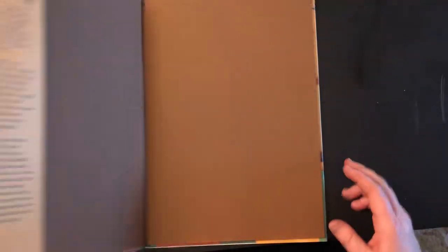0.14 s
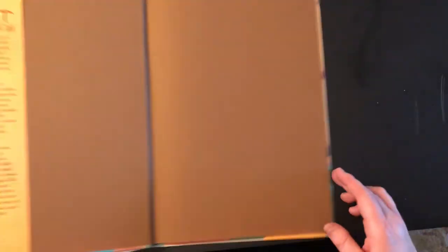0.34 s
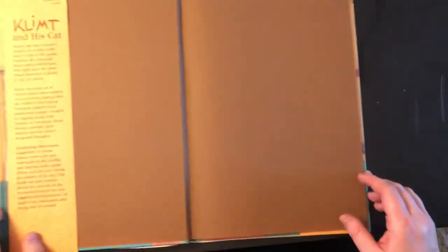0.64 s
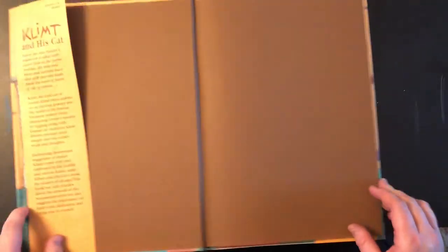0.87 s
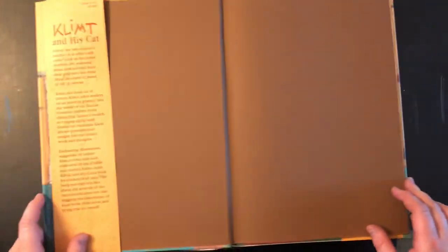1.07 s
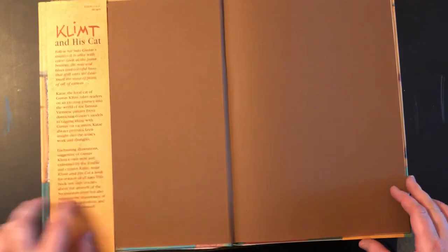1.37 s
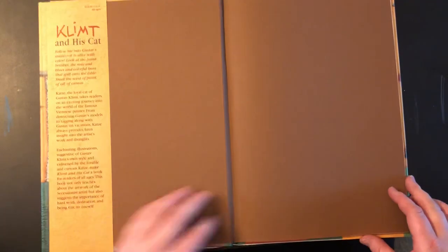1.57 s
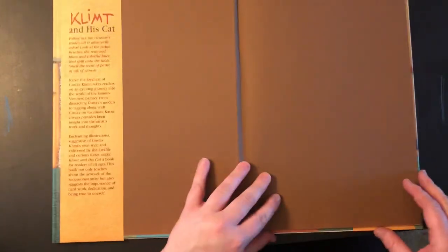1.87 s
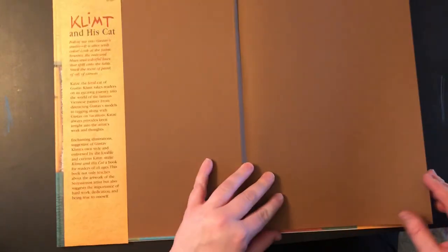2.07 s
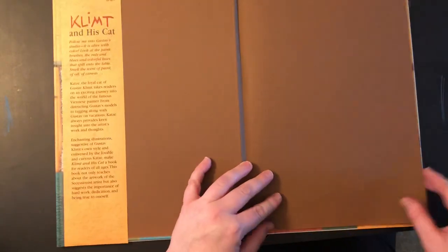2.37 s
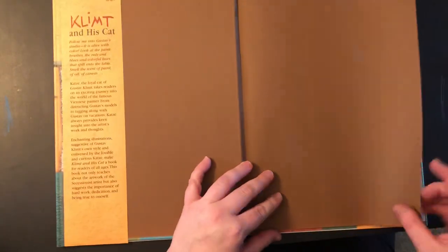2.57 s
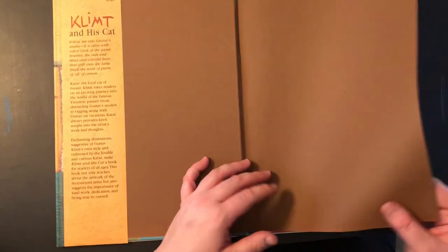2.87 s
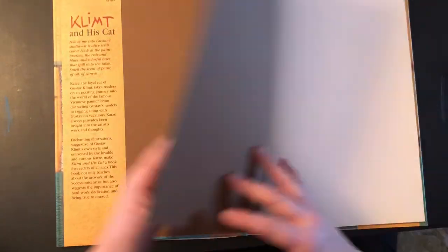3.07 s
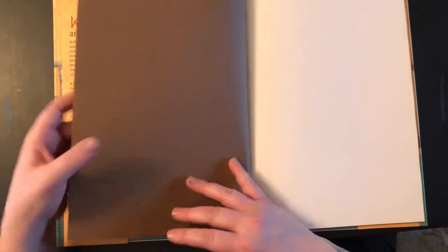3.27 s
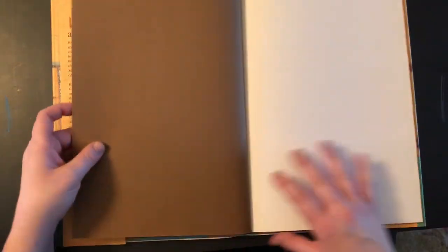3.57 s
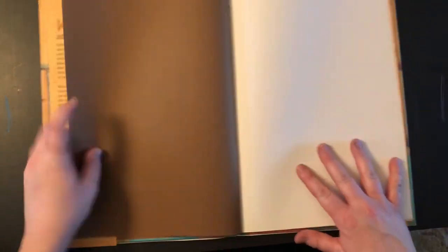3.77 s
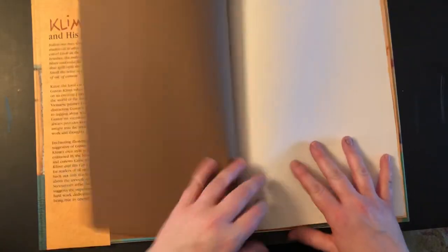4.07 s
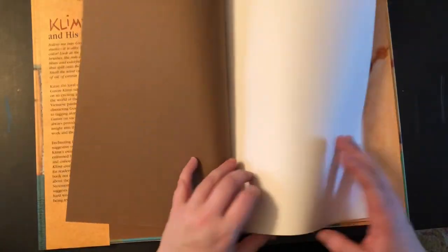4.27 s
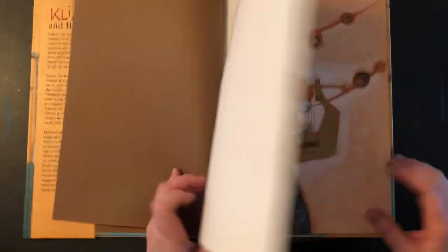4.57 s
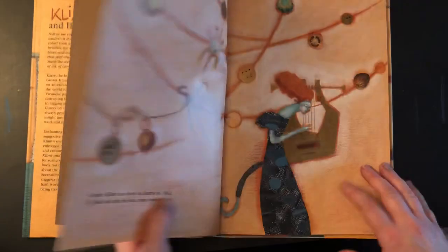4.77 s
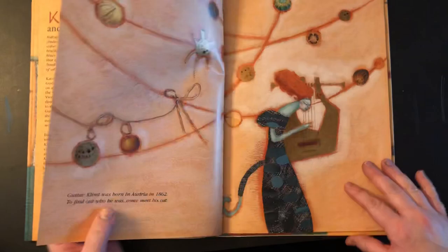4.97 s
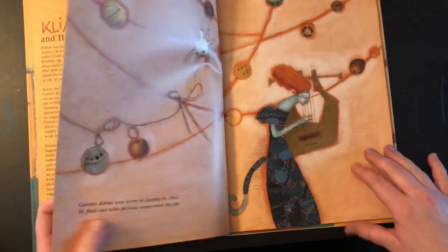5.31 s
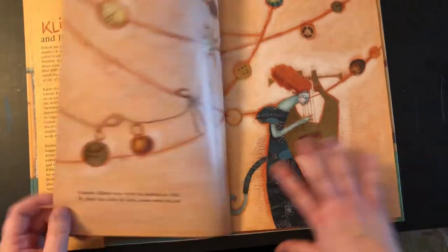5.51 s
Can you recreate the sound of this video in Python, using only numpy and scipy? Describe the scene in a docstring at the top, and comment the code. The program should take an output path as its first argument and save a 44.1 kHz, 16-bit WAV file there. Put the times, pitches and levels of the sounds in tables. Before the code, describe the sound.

Dry paper handling, heard close and centred: smooth swishes of palms and jacket paper, a brief pop, near quiet, then two heavy pages turned one after the other. Each page gives crisp edge snaps, a hissing slide and a boxy wobbling flutter. A last hard snap comes near the end with softer rustling. The room is small with very short reflections, over low steady air rumble and a barely audible hum.

```python
"""Opening a book and turning two pages

A large hardcover book is opened on a desk in a small room and two stiff pages are turned.
Cover, hands and paper slide with a dry hiss made of countless tiny slips and coarser crease ticks.
Each lifted sheet buckles with a hollow, fluttering rumble: soft pops ring its resonances.
Paper edges and the cover snap as short coloured impulses; ventilation rumble and hum lie below."""
import sys
import numpy as np
from scipy import signal
from scipy.fft import rfft, irfft
from scipy.io import wavfile
from scipy.ndimage import uniform_filter1d

SR = 44100
rng = np.random.default_rng(int(sys.argv[2]) if len(sys.argv) > 2 else 0)


def store_wav(level_fs):
    """Save 16-bit WAV to argv[1]."""
    pcm = np.round(np.clip(np.atleast_2d(level_fs), -1, 1) * 32767)
    wavfile.write(sys.argv[1], SR, pcm.T.astype(np.int16))


N = 248854
TIME = np.arange(N) / SR


def from_db(db):
    """Turn decibels into gain."""
    return 10 ** (np.asarray(db) / 20)


def rms_one(x):
    """Scale to an rms (average strength) of 1."""
    return x / np.sqrt(np.mean(x ** 2) + 1e-20)


def at_hz(points, hz):
    """Read a table by frequency, with straight lines on a logarithmic axis."""
    table_hz, values = np.array(points).T
    return np.interp(np.log(hz), np.log(table_hz), values)


def in_time(rows):
    """Join the rows of a curve in time by straight lines."""
    s, *columns = np.transpose(rows)
    return [np.interp(TIME, s, column) for column in columns]


def butter(x, hz, kind, order=2):
    """Butterworth filter that works forward in time only."""
    hz = np.clip(hz, 10, 0.45 * SR)
    sos = signal.butter(order, hz, kind, fs=SR, output="sos")
    return signal.sosfilt(sos, x + 1e-18)


def resonance(x, hz, width):
    """Ring at one pitch: a two-pole band-pass, width in Hz, with gain 1 at its peak."""
    r = np.exp(-np.pi * width / SR)
    feed = np.array([1, 0, -1]) * (1 - r * r) / 2
    feedback = [1, -2 * r * np.cos(2 * np.pi * hz / SR), r * r]
    return signal.lfilter(feed, feedback, x)


def coloured(x, spectrum):
    """Give a steady noise a spectrum; rms 1."""
    hz = np.maximum(np.fft.rfftfreq(N, 1 / SR), 1)
    return rms_one(irfft(rfft(x) * from_db(at_hz(spectrum, hz)), N))


def causal_response(spectrum, size):
    """Minimum-phase response of a short spectrum: nothing sounds before the blow."""
    hz = np.maximum(np.fft.rfftfreq(size, 1 / SR), 1)
    cepstrum = irfft(np.log(from_db(at_hz(spectrum, hz))), size)[:size // 2]
    return np.exp(rfft(2 * cepstrum, size) - cepstrum[0])


def drift(per_s):
    """Smooth random wandering, no faster than about per_s cycles a second; rms 1."""
    noise = rng.standard_normal(N + SR)
    return rms_one(butter(noise, per_s, "low")[SR:])  # skip the filter's start-up


def grains(per_s, spread_db, largest=2.9):
    """Clicks at random moments, of uneven size and random sign; rms 1."""
    sizes = from_db(spread_db * np.minimum(rng.exponential(1, N), largest))
    signs = rng.choice([-1, 1], N)
    return rms_one(sizes * signs * (rng.random(N) < per_s / SR))


# the background's rumble and soft hiss: (frequency [Hz], relative level per Hz [dB])
AMBIENCE = [(15, -62), (25, -33), (59, -10), (92, -14), (123, -4.5), (157, -10), (229, -12.5), (263, -14.5),
            (293, -18.5), (384, -20.5), (463, -23.5), (516, -26.5), (887, -37), (4490, -39.5), (16000, -50)]
AMBIENCE_DB = -60.5  # rms
HUM_HZ, HUM_DB = 120, -74.5  # the level is rms


def background():
    """Ventilation rumble and soft hiss as coloured noise, plus mains hum as a sine."""
    air = from_db(AMBIENCE_DB) * coloured(rng.standard_normal(N), AMBIENCE)
    hum = from_db(HUM_DB) * np.sqrt(2) * np.sin(2 * np.pi * HUM_HZ * TIME)
    return air + hum


# how long the room's reflections last: (frequency [Hz], time to fall 60 dB [s])
ROOM_T60 = [(150, 0.92), (1000, 0.1), (4000, 0.17), (15000, 0.27)]


def room(x, gap=0.0044):
    """Diffuse reflections follow after a short gap [s]; the bass dies away slowest."""
    age = np.arange(SR // 2) / SR
    edges = np.geomspace(120, 16000, 8)
    tail = np.zeros(len(age))
    for low, high in zip(edges, edges[1:]):
        t60 = at_hz(ROOM_T60, np.sqrt(low * high))
        band = butter(rng.standard_normal(len(age)), [low, high], "band")
        tail += band * from_db(-60 * age / t60)
    tail *= age > gap
    tail /= np.sqrt(np.sum(tail ** 2))
    tail = butter(tail, 4900, "low", order=1)
    return signal.fftconvolve(x, tail)[:N]


# early reflections off page, desk and stand: (average delay [s], gain)
ECHOES = [(.0009, 0.34), (.0021, -0.28), (.0037, .22)]


def page_echo(x, sway=0.1117):
    """Nearby surfaces mirror the sound; the paths change as the hand moves."""
    stretch = np.exp(sway * drift(1.5))
    return x + sum(gain * np.interp(TIME - lag * stretch, TIME, x) for lag, gain in ECHOES)


# paper, cover or palm sliding: the cover swings open and settles on the desk, the left hand leaves
# the jacket flap and smooths the endpaper, fingers find and turn the first sheet, then the second
# is dragged up, carried over and pressed flat: (time of peak [s], hiss level [dB], swell [s],
# fade [s], body level above the hiss [dB], sheen level above the hiss [dB])
STROKES = [ (0.01, -69.5, 0.033, 0.034, -1, -6), (0.087, -61.5, 0.017, 0.027, -7, -7),
           (0.135, -68, .02, 0.045, -6, -3), (0.184, -56, 0.014, 0.08, -3, -5),
           (0.37, -45, 0.062, 0.12, -6, -5), (0.441, -48, 0.076, 0.074, -2, -2.5),
           (0.53, -57.5, .05, 0.15, 2, -12), (0.75, -47.5, 0.16, 0.097, -1, -6.5),
           (0.93, -44, 0.15, .12, -10, -10), (1.03, -47, 0.054, 0.11, -6.5, -9.5),
           (1.245, -62.5, 0.035, 0.029, 4, 0), (1.288, -54.5, .025, 0.066, -8.5, -10),
           (1.375, -59, 0.013, 0.042, -1, -4), (1.425, -61.5, 0.017, 0.017, -13, 4.5),
           (1.668, -61, 0.0054, .07, -4, 1), (1.745, -51, 0.058, .11, -4, -7.5),
           (1.95, -65.5, 0.07, 0.11, 3.5, -10), (2.3, -64.5, 0.033, 0.07, -8, -18),
           (2.448, -72.5, 0.15, 0.19, 4.5, -25), (2.58, -52, .012, 0.079, -6.5, -9),
           (2.654, -49, 0.053, 0.046, -3.5, -2), (2.76, -54, 0.083, 0.071, -1, -6.5),
           (2.874, -45.5, 0.033, 0.044, -10, -10.5), (2.957, -46.5, 0.045, 0.041, -3, -1.5),
           (3.065, -61, 0.037, 0.045, -8, -1), (3.16, -65.5, 0.06, 0.06, 5, -13),
           (3.235, -59, 0.05, 0.088, 3.5, 0.5), (3.347, -54, 0.017, 0.035, -9, -4.5),
           (3.51, -64.5, 0.054, 0.17, 4, -6), (3.622, -57.5, .03, 0.1, 2.5, -3.5),
           (3.69, -63.5, 0.037, 0.065, 11, -7.5), (3.808, -43.5, 0.036, 0.048, -6, -5),
           (3.89, -47, 0.048, 0.06, -7.5, -0.5), (4.012, -48, 0.045, 0.024, -4.5, -4.5),
           (4.078, -53.5, 0.026, 0.042, -11, -2), (4.114, -42.5, 0.0098, 0.049, -0.5, 0),
           (4.18, -47, 0.05, 0.092, -15, -11), (4.28, -44, 0.082, 0.097, -8.5, -1.5),
           (4.38, -51, 0.031, 0.078, -7, -1.5), (4.532, -55, 0.12, 0.046, -3.5, -8),
           (4.628, -46, 0.082, 0.08, -7, -4.5), (4.72, -59.5, 0.091, 0.13, -1.5, 4.5),
           (4.855, -52, 0.062, 0.2, -1, -3.5), (5.06, -60, 0.12, 0.28, 1.5, -8),
           (5.28, -65, 0.027, 0.066, -5, 3), (5.375, -55.5, 0.11, 0.09, -3, -2.5),
           (5.57, -61.5, 0.094, 0.082, 4, -4)]
# hands resting on the paper: (body level [dB], hiss level [dB], sheen level [dB])
RESTING_DB = (-81.5, -86.5, -87)
STROKE_SHAPE = 1.52  # the hiss drops 10 dB in one swell or fade time, along this power of time
BODY_FOLLOWS, SHEEN_FOLLOWS = 0.74, 1.42  # share of that drop: a slowing stroke grows duller


def stroke_levels():
    """Strokes swell and fade by one law and add in power; gives body, hiss and sheen levels in dB."""
    t = TIME[::32]
    power = from_db(RESTING_DB)[:, None] ** 2 + np.zeros(len(t))
    for s, db, swell, fade, body, sheen in STROKES:
        away = np.maximum((s - t) / swell, (t - s) / fade)
        drop = 10 * np.minimum(away ** STROKE_SHAPE, 20)
        levels = [db + body - BODY_FOLLOWS * drop,
                  db - drop,
                  db + sheen - SHEEN_FOLLOWS * drop]
        power = power + from_db(levels) ** 2
    return [np.interp(TIME, t, 10 * np.log10(band)) for band in power]


def creases(per_s=420, width=0.24):
    """Small creases give way at random, each ticking at one of twelve pitches; rms 1."""
    pops = grains(per_s, spread_db=2.6)
    pitches = np.geomspace(1100, 13000, 12)
    dealt = rng.integers(0, len(pitches), N)
    ticks = np.zeros(N)
    for k, hz in enumerate(pitches):
        ticks += resonance(pops * (dealt == k) + 1e-18, hz, width * hz)
    return rms_one(ticks)


# the free span of paper ringing under a stroke:
# (start time [s], end time [s], pitch [Hz], gain over the plain rub)
SPANS = [(0.785, 1.176, 1800, 1.8), (0.798, 1.157, 2700, 0.86), (1.678, 1.855, 920, 1),
         (1.67, 1.873, 3320, 1.2), (2.705, 2.854, 1450, 0.61), (2.955, 2.98, 1720, 2.2),
         (2.927, 2.972, 5570, 2.5), (3.166, 3.38, 4740, 1.2), (3.59, 3.722, 3380, 0.98),
         (3.761, 3.855, 1400, 1.2), (3.79, 3.96, 5940, 1.1), (3.847, 3.97, 5050, 2),
         (4.196, 4.375, 970, 2.9), (4.214, 4.365, 2000, 1.1)]
SPAN_WIDTH = 0.1  # width of that ring as a share of its pitch


def ringing_spans(rub):
    """While a free span of paper is rubbed it rings at its own pitch."""
    rings = np.zeros(N)
    for start, end, hz, gain in SPANS:
        held = np.clip(np.minimum(TIME - start, end - TIME) / 0.019, 0, 1)  # soft start and end
        rings += gain * resonance(rub * held, hz, SPAN_WIDTH * hz)
    return rings


# tone of paper friction: (frequency [Hz], relative level per Hz [dB])
FRICTION = [(180, -35), (300, -2), (348, -13), (433, -0.5), (519, -2.5), (624, 2.5), (774, -2.5),
            (946, -3.5), (2100, 0.5), (2280, -1.5), (3890, 3.5), (6200, -3), (8090, -6), (15200, -12.5),
            (16000, -21)]
# creasing of the rubbed paper: (time [s], crinkle level relative to the fine slips [dB])
CREASING = [(0, -13), (1.1, -43), (1.25, -4.5), (1.7, -9), (2.5, -7.5), (2.9, -7.5), (3.9, -10), (4.3, -12),
            (4.7, -5), (5.05, -21.5), (5.6, 2)]


def sliding(judder_db=0.36, patchy_db=0.35):
    """Fibres catch and let go thousands of times a second, creases add ticks; the pressure wavers."""
    body_db, hiss_db, sheen_db = stroke_levels()
    crinkle_db, = in_time(CREASING)
    slips = grains(per_s=20000, spread_db=1.5) + from_db(crinkle_db) * creases()
    friction = page_echo(coloured(slips, FRICTION))
    bands = [(butter(friction, 1840, "low", order=4), body_db),
             (butter(friction, [2200, 7300], "band", order=4), hiss_db),
             (butter(friction, 8200, "high", order=4), sheen_db)]
    judder = judder_db * drift(37)  # shared by all bands
    rub = np.zeros(N)
    for band, level_db in bands:
        patches = patchy_db * drift(43)  # each band's own
        rub += rms_one(band) * from_db(level_db + judder + patches)
    return rub + ringing_spans(rub)


# resonances of a stiff sheet over the book: (frequency [Hz], width [Hz], level [dB])
SHEET = [(138, 22, -4), (195, 94, -6.5), (382.5, 90, -3), (419, 56, -3), (480, 43, -3.5), (561, 92, -5),
         (640, 51, -3.5), (722, 33, -4.5), (828, 27, -7.5), (908.5, 53, -4.5), (1040, 240, -8),
         (1224, 160, -7), (1262, 51, -4), (1390, 86, -5.5), (1476, 195, -8), (1800, 285, -8),
         (2180, 610, -12.5), (3010, 1500, -14), (3700, 600, -53)]


def popping_sheet(crinkle_db=-13):
    """A steady volley of soft pops sets the sheet's resonances ringing, with some bare crinkle."""
    pops = grains(per_s=970, spread_db=-1.0)
    rings = np.zeros(N)
    for k, (hz, width, db) in enumerate(SHEET):
        rings += (-1) ** k * from_db(db) * resonance(pops, hz, width)
    crinkle = rms_one(butter(pops, [500, 4000], "band"))
    return rms_one(rings) + from_db(crinkle_db) * crinkle


# a sheet buckling, and at 2.568 s the sudden start of a stroke played the same way: (time of peak [s], level
# [dB], rise over the last 10 dB [s], # time to fall 60 dB [s], pitch of the bend [Hz])
BUCKLES = [(0.186, -48, 0.0093, .37, 2950), (0.875, -48, 0.005, .05, 487), (1.029, -51, 0.0035, 0.2, 775),
           (1.301, -34, 0.0017, 0.023, 680), (1.318, -50, 0.0083, 0.19, 990),
           (1.684, -55.5, 0.016, 0.085, 425), (1.874, -50.5, .002, 0.14, 1420),
           (2.568, -51.5, .0015, 0.14, 3000), (2.876, -51, 0.025, 0.1, 3100),
           (2.981, -36.5, 0.012, 0.41, 1010), (3.149, -43, 0.0026, 0.23, 720),
           (3.245, -41.5, .006, 0.23, 850), (3.26, -33.5, 0.0036, 0.29, 890),
           (3.298, -36.5, 0.024, 0.19, 960), (3.404, -34, .019, 0.26, 814),
           (3.572, -46.5, 0.0088, .22, 600), (3.835, -44.5, 0.0038, 0.16, 1170),
           (3.878, -44, 0.014, 0.28, 1170), (4.013, -41.5, .002, 0.26, 890),
           (4.046, -42.5, 0.012, .26, 590), (4.123, -36.5, 0.02, 0.086, 1040),
           (4.148, -31.5, 0.016, 0.25, 1170), (4.261, -41, 0.0034, 0.056, 1050),
           (4.39, -46, 0.012, 0.18, 860), (4.55, -51.5, .004, 0.051, 1200), (4.758, -45, 0.0028, 0.22, 860),
           (4.769, -42.5, 0.0036, 0.2, 1030), (4.956, -43.5, 0.004, 0.1, 990), (5.12, -55, .006, 0.7, 518),
           (5.336, -31, .0013, 0.22, 1510), (5.362, -36.5, 0.015, 0.16, 965),
           (5.418, -37, 0.012, 0.26, 720), (5.55, -39.5, 0.006, 0.12, 980), (5.57, -47.5, 0.003, .26, 930),
           (5.607, -44.5, 0.022, 0.18, 730)]
BEND_EDGE = 1.95  # the rumble reaches up to about this multiple of the bend's pitch


def buckling(flutter_db=0.5, bend_gain=1.18, bend_width=0.36, low_edge=0.45):
    """A bend runs through the sheet; its curvature favours one range of the sheet's resonances."""
    sheet = popping_sheet()
    out = np.zeros(N)
    for s, db, rise, t60, bend_hz in BUCKLES:
        bend = sheet + bend_gain * resonance(sheet, bend_hz, bend_width * bend_hz)
        bend = butter(bend, BEND_EDGE * bend_hz, "low", order=3)
        bend = butter(bend, low_edge * bend_hz, "high", order=1)
        # the hand feeds the bend at an even rate
        local_power = uniform_filter1d(bend ** 2, int(0.0188 * SR))
        bend = bend / np.sqrt(local_power + 1e-6)
        age = TIME - s
        shape_db = np.where(age < 0, -10 * (age / rise) ** 2, -60 * age / t60)
        out += bend * from_db(db + np.maximum(shape_db, -200))
    return out * from_db(flutter_db * drift(37))


# paper edges and cover snapping, before the offsets set in snapping(): (time [s], level [dB],
# body level above that [dB], sheen level above that [dB], ring pitch [Hz], crack decay [s])
SNAPS = [(0.0726, -60, 5, 6, 3000, 0.0012), (0.172, -41.5, -2, 10.5, 6250, .0005),
         (0.1728, -40, 3.5, 6, 1150, .0008), (0.175, -35, -10, -21, 3000, 0.0012),
         (0.1835, -58, -7, 12, 7060, .004), (1.2973, -35.5, -8, -10, 3350, 0.0021),
         (1.2993, -41, 12.5, -13, 715, 0.00095), (1.3635, -51.5, -2, -18, 3260, 0.0048),
         (1.661, -53, -2, -3, 3520, 0.0033), (1.873, -45.5, -0.5, 5, 1570, 0.0016),
         (2.3448, -47.5, 3.5, -7.5, 1430, 0.0075), (2.6173, -44.5, 2.5, -12, 710, .003),
         (2.8618, -28, -5.5, -11.5, 2360, 0.005), (2.9504, -28.5, -16, -4, 1720, .0065),
         (2.957, -39.5, -7, 2, 5350, 0.0033), (3.1147, -46.5, 0, -4, 2300, 0.0071),
         (3.2367, -46.5, 6, -5, 4000, 0.0019), (3.2597, -49.5, 24, -13, 830, 0.0045),
         (3.296, -39.5, 7, -21, 840, .0046), (3.3638, -50, 10, 2, 5200, .0024),
         (3.3882, -48.5, 5, -8, 1010, 0.0037), (3.5675, -64.5, 23.5, -14, 640, .0017),
         (3.633, -47, -9, -6, 3600, 0.0045), (3.8629, -35, -18, 3, 3980, 0.0079),
         (3.941, -46.5, -15, 5, 4980, .003), (4.0115, -45.5, 4, -5, 1000, 0.0023),
         (4.1057, -41.5, 3, 7.5, 1040, 0.0051), (4.954, -52, 10, -6, 996, 0.0031),
         (5.0344, -48.5, 0, -19, 2870, .003), (5.1154, -46.5, -3, -8, 916, 0.0032),
         (5.1771, -46, 2, 2.5, 5800, 0.0055), (5.2455, -47.5, 0.5, -8, 1710, 0.0033),
         (5.3326, -27.5, 0, -20, 3620, 0.001), (5.334, -28, 0, -21, 1590, 0.0047),
         (5.354, -35, 8, -21, 1080, 0.00071), (5.5488, -45, 5, -23, 1590, .003),
         (5.565, -41.5, 7, -11.5, 5240, 0.0064), (5.5965, -53, 6, -6, 2330, .003)]
SNAP_BUILD_UP = 0.25  # a crack builds up in this share of its decay time


def snapping(crackle=0.21, body_db=4.5, sheen_db=-1.5, level_db=4.0, ring_gain=2.02, ring_width=0.14):
    """An edge lets go: slips build up to one impulse, die away, and the paper strip rings briefly."""
    size, lead = 2048, 256  # samples in all, and before the impulse
    span = SR / 200  # levels refer to the rms over five milliseconds
    age = (np.arange(size) - lead) / SR
    out = np.zeros(N + size)
    for s, db, body, sheen, ring_hz, decay in SNAPS:
        envelope = np.exp(np.minimum(age / (SNAP_BUILD_UP * decay), -age / decay))
        force = crackle * rng.standard_normal(size) * envelope
        force[lead] += 1
        low, top = body + body_db, sheen + sheen_db
        colour = [(100, low - 24), (350, low - 9), (650, low), (1150, low),
                  (1800, 0), (3600, 0), (6500, top), (16000, top - 10)]
        snap = irfft(rfft(rms_one(force)) * causal_response(colour, size), size)
        snap = snap + ring_gain * resonance(snap, ring_hz, ring_width * ring_hz)
        start = round(s * SR) - lead
        out[start:start + size] += snap * np.sqrt(span / size) * from_db(db + level_db)
    return out[:N]


def scene(snap_room_db=-11, sheet_room_db=-15):
    """The book close to one microphone, alike in both channels."""
    snaps, sheets = snapping(), buckling()
    reflections = room(from_db(snap_room_db) * snaps + from_db(sheet_room_db) * sheets)
    mono = background() + reflections + sliding() + sheets + snaps
    return np.array([mono, mono])


CUTOFF_HZ = 16100


def record(dry):
    """The top of the treble is cut steeply."""
    steep = signal.ellip(10, 0.1, 80, CUTOFF_HZ, fs=SR, output="sos")
    return signal.sosfilt(steep, dry)


dry = scene()
out = record(dry)
store_wav(out)
```